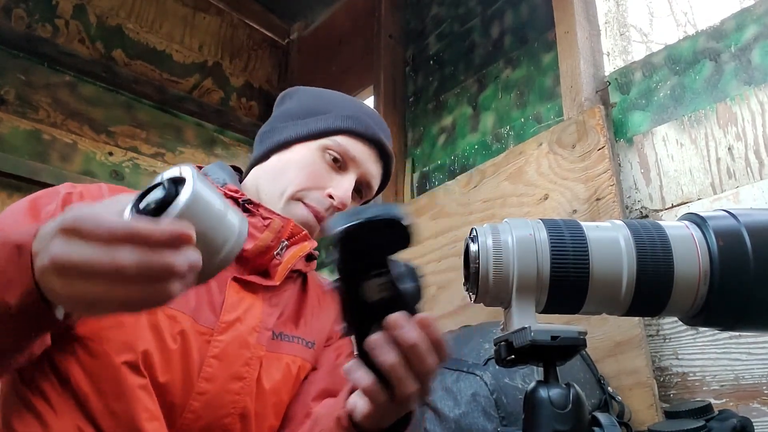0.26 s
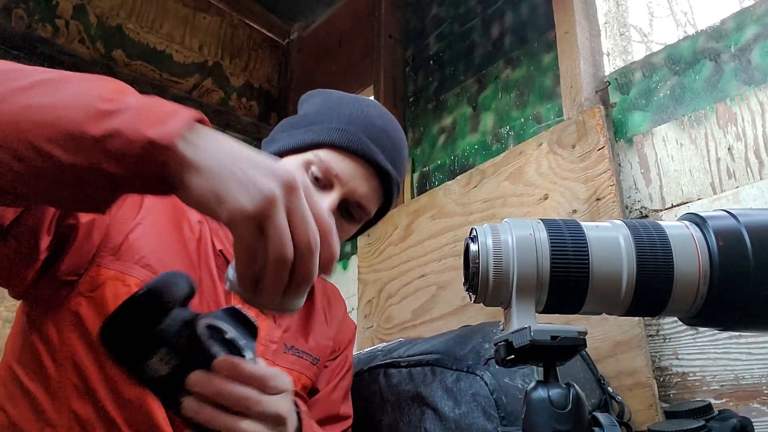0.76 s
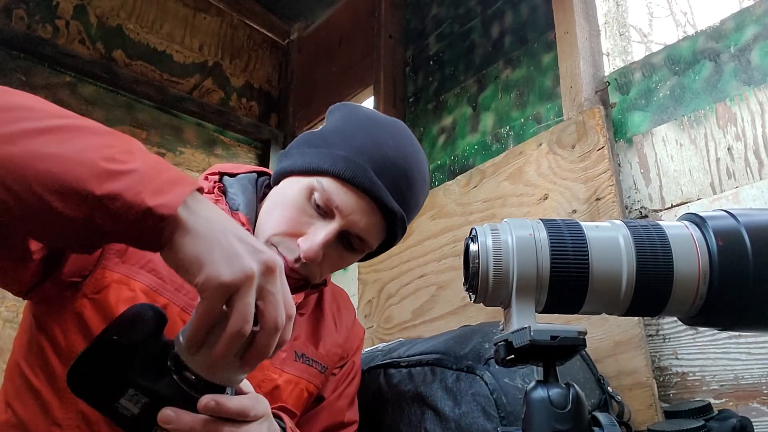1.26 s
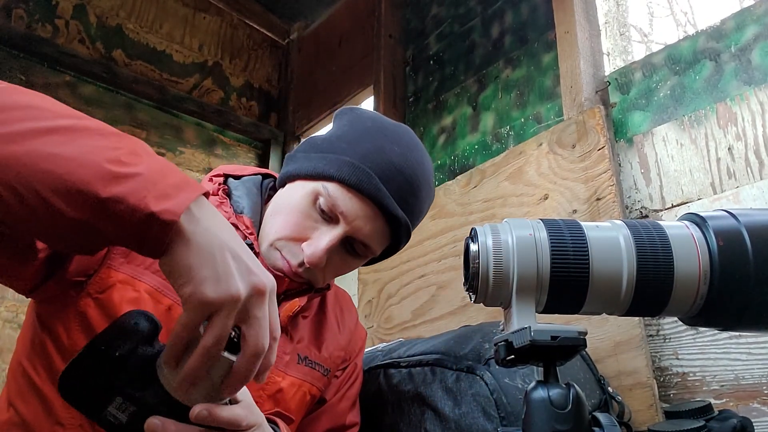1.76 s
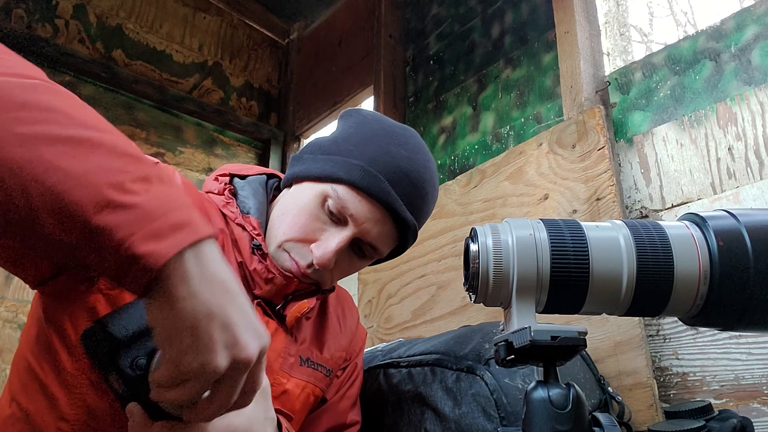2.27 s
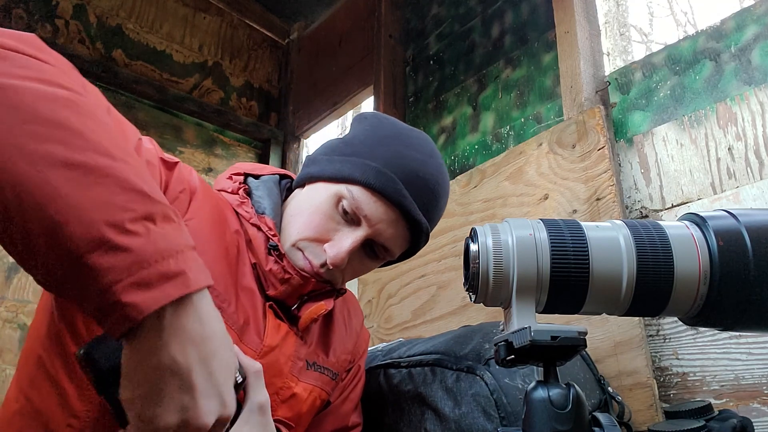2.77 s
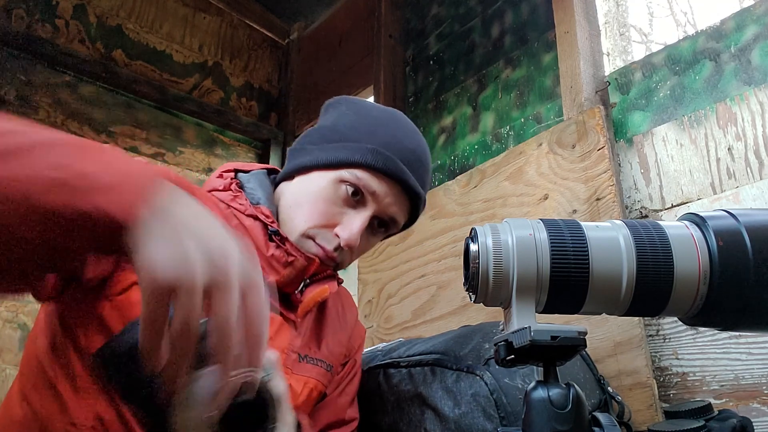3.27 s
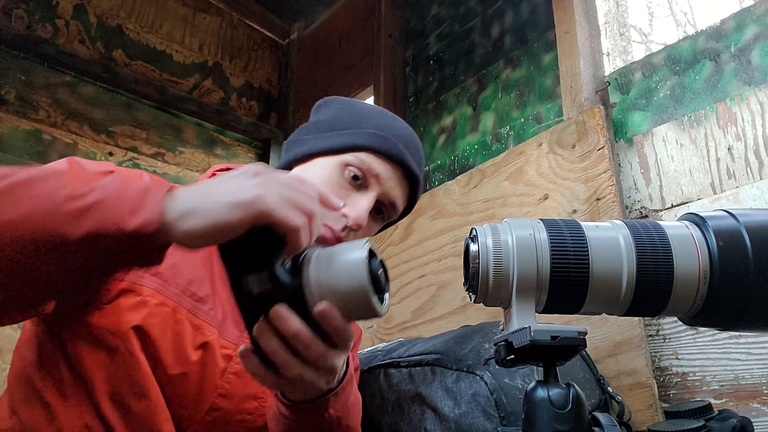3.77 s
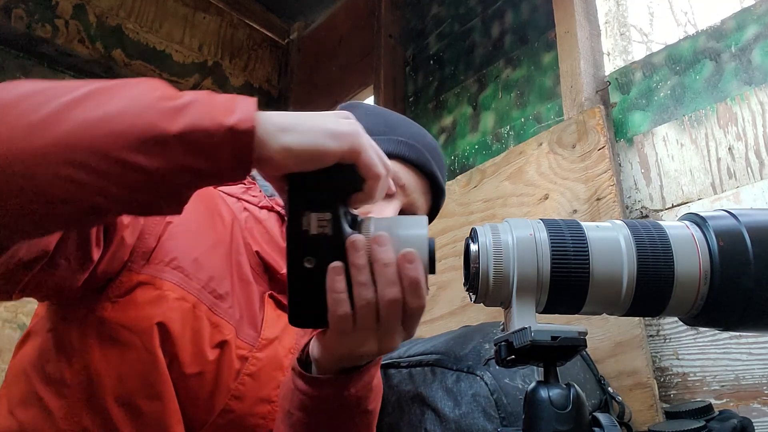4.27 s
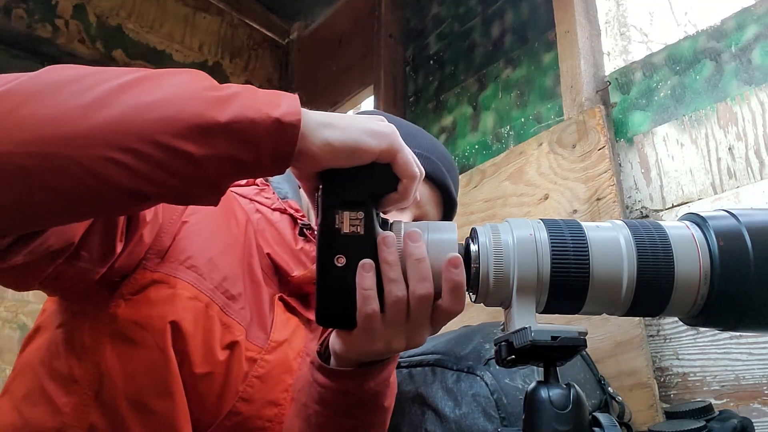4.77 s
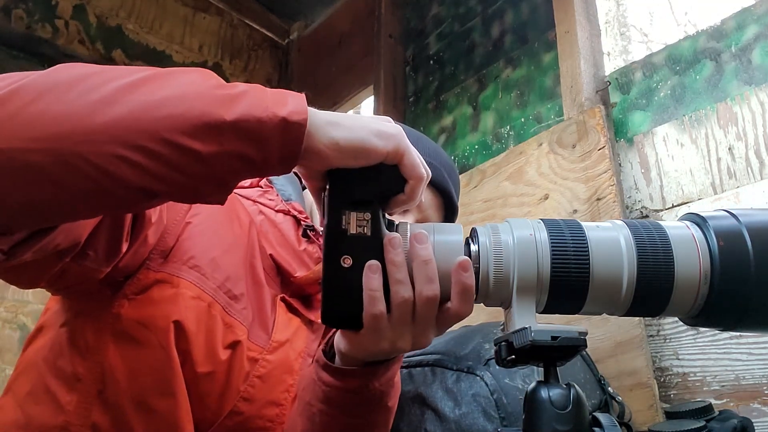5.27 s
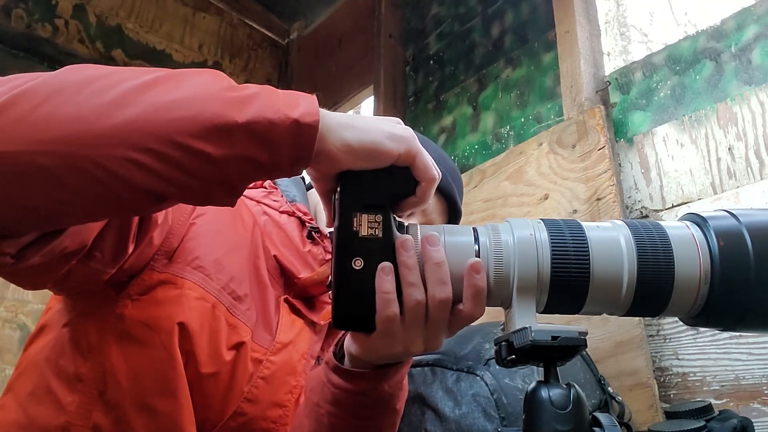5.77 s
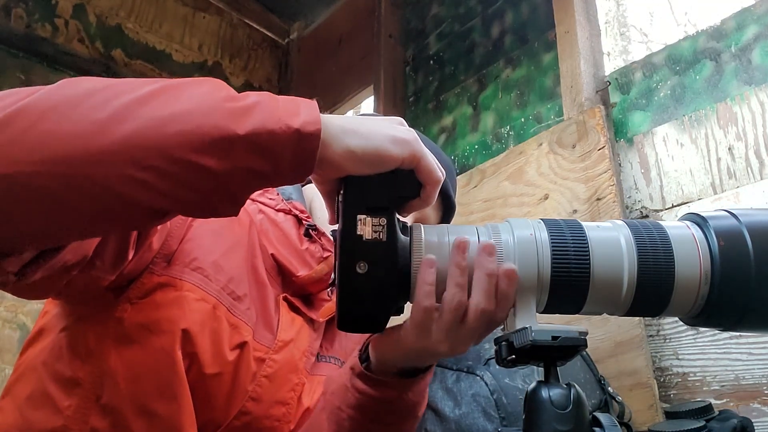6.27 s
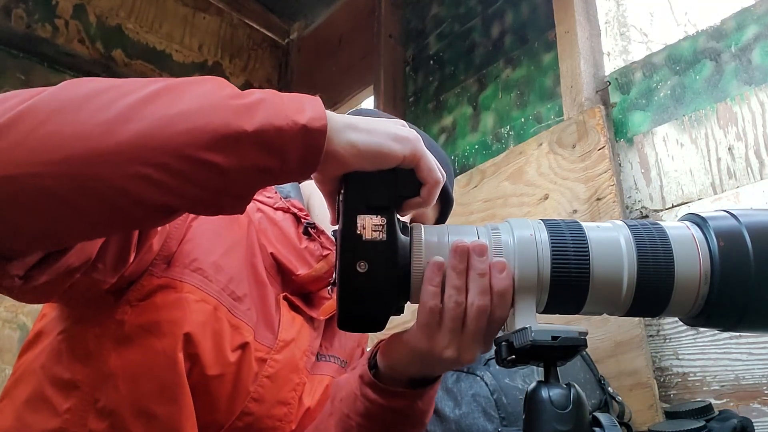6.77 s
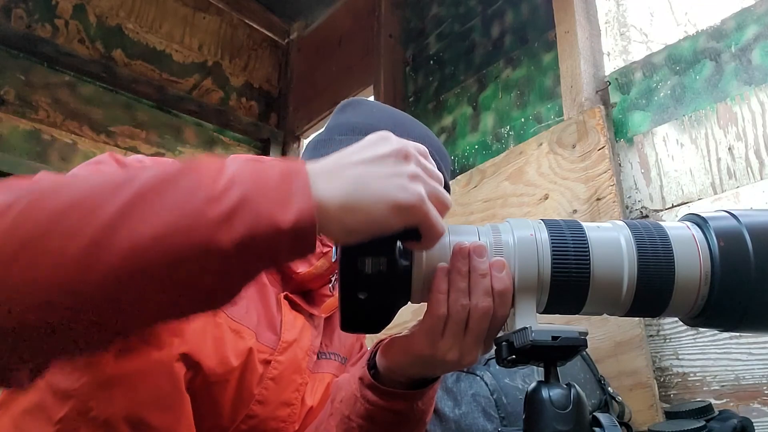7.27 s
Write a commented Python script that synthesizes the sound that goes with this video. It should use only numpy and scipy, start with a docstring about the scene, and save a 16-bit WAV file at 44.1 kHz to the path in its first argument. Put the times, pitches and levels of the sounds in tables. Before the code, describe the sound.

Nylon sleeves swish as metal camera and lens mounts are fitted together with sharp clicks and rattles, over a faint low hum.

```python
"""A nylon jacket swishes as arms move, its sleeves sliding over the cloth in a small plywood blind.
Then metal chatters: a teleconverter's bayonet lugs find a camera's mount, turn and latch, and the pair
is twisted onto a long lens. Each contact rings the parts and the hut; smooth barrels rub in between.
A faint low drone and a dull outdoor rumble lie under it all, heard by a spaced pair of microphones."""
import sys
import numpy as np
from scipy import signal
from scipy.fft import rfft, irfft, next_fast_len
from scipy.io import wavfile

SR = 44100
rng = np.random.default_rng(int(sys.argv[2]) if len(sys.argv) > 2 else 0)


def put_to_file(sound):
    """Save the sound as 16-bit audio at rate SR, in the file named by the first command-line argument."""
    columns = np.atleast_2d(sound).T  # one column per channel
    safe = np.clip(columns, -1, 1)
    whole_steps = np.round(safe * 32767)
    wavfile.write(sys.argv[1], SR, whole_steps.astype(np.int16))


N = 332073
TIME = np.arange(N) / SR
RING = 10240  # samples given to one hit and its tail

# metal-on-metal hits: (time [s], strength [dB], hardness [dB per octave])
LUG_HITS = [(1.3485, -3.5, 1.1), (1.3595, -1, -1.3), (1.3975, -6.5, 0.7), (1.416, 1.5, 0.6),
            (1.4395, 3.5, 0.1), (1.4455, -3.5, -4.5), (1.464, -7, -1), (1.48, -13, 0.5), (1.494, -3, -1.5),
            (1.502, -13.5, -3.5), (1.513, -2, -0.5), (1.5225, -6.5, -2), (1.565, -10.5, -2.5),
            (1.6425, -11.5, -5.5), (1.71, -21, -5.5), (1.775, 8, 2), (1.7815, 12, 1.95), (1.791, 2, -2),
            (1.7995, 6.5, 1.7)]  # the converter's lugs find the camera mount and drop in
TURN_HITS = [(1.9356, -25, 6.5), (1.958, 2, 1), (2.168, -25, -7.5), (2.185, -16.5, -3), (2.202, 2, -0.3),
             (2.415, -25.5, -10), (2.5856, -41, 11.5)]  # the bayonet turns in the mount
LATCH_HITS = [(2.8856, -25, 5.5), (2.8937, -21, 2.5), (2.8978, .5, 0.23)]  # its sprung pin snaps home
LENS_HITS = [(5.5495, -23, -.7), (5.579, -3.5, -4), (5.5835, -3, -1), (5.595, -3.5, -0.2), (5.6, -6, -0.5),
             (5.882, -10, -4), (5.888, -5.5, 0.5), (5.902, -7.5, -1.5), (5.912, -4, -0.6),
             (5.92, -2.5, -2.5), (5.938, -7, 1.5), (5.9703, 6.5, 0), (5.978, 4.5, 0.5), (5.981, -5.5, 8),
             (6.075, -23, -3), (6.196, -16, -4)]  # the pair meets the long lens
LOCK_HITS = [(6.578, -19.5, -2), (6.592, -18, -2.5), (6.609, -18.5, -2), (6.837, -23.5, -4),
             (6.926, -3.5, -2.5), (6.942, -12, 3), (6.949, -4.5, -1.5), (6.9625, -2.5, 3)]  # the lens bayonet turns and locks
# resonances of each struck part: (frequency [Hz], width [Hz], level [dB])
CONVERTER_MODES = [(271, 16, 11.5), (430, 9.4, 14), (605, 60, 5), (680, 54, 5), (923, 30, -2),
                   (2400, 80, 7.5), (2770, 110, 6), (2905, 46, 13), (3070, 44, 15), (3970, 110, 6.5)]
MOUNT_MODES = [(278, 14, 9.3), (640, 56, 6.3), (798, 53, 2.4), (1000, 160, 3.4), (2520, 140, 5),
               (2870, 220, 3.3), (3770, 390, 6.4), (6260, 830, 3.7)]
LATCH_MODES = [(1145, 40, 1), (1340, 130, 11), (1490, 150, 9), (2500, 190, 4.6), (3745, 450, -4.5),
               (4940, 400, 2), (6240, 340, 7), (14730, 1100, 6)]
LENS_MODES = [(187.9, 7.6, 16), (270, 5.9, 5), (333, 8.8, 5), (514, 17, 6), (713, 49, 4.5), (1027, 14, 7),
              (1140, 91, 7.5), (2034, 220, 12), (4850, 260, 10.5)]
LOCK_MODES = [(284, 11, 9.8), (430, 29, 5.8), (530, 30, 7.1), (2004, 140, 19.6), (2420, 62, 8.9),
              (4880, 120, 16.7), (6000, 300, 7.6)]
# band centres of a hit: (thud [Hz], knock [Hz], clack [Hz], ping [Hz], tick [Hz])
TONE_BANDS_HZ = [250, 700, 2600, 6000, 13000]
# tone of an ordinary hit on each part: (thud [dB], knock [dB], clack [dB], ping [dB], tick [dB])
CONVERTER_TONE = [-4.5, -0.5, -10, -17, -22.5]
MOUNT_TONE = [-4.5, 1, -4.5, -21, -24.5]
LATCH_TONE = [2.5, 0, 5, -5, -6]
LENS_TONE = [-3, -0.5, -15, -19.5, -28.5]
LOCK_TONE = [-2, -7.5, -20.5, -27.5, -41]
# colour shared by all hits: (frequency [Hz], gain [dB])
HIT_EQ = [(40, -15.5), (115, 0), (150, -5), (300, -1), (700, -2.5), (1100, -4.5), (1800, -7), (3000, -1),
          (4000, 0.5), (4900, -6), (6400, -1), (9000, -7.5), (12000, 3.5), (15500, -2)]
# sleeve drags: (peak time [s], rise [s], fall [s], relative level [dB], extra hiss [dB])
ARM_MOVES = [(0.02, .15, 0.12, -75, 5), (0.48, 0.22, .17, -64, 1.5), (0.72, 0.39, 0.16, -58, 3),
             (1.08, 0.14, .14, -77.5, 7), (1.8, 0.45, 0.68, -77.5, 4.5), (2.28, 0.1, 0.1, -65.5, 1),
             (2.51, 0.095, 0.21, -71.5, 2.5), (2.83, 0.086, 0.16, -67, -0.5), (3.2, 0.094, 0.084, -64.5, 3),
             (3.429, 0.17, 0.13, -59.5, 3.5), (4.09, 0.21, 0.22, -61.5, 1.5), (4.36, 0.05, 0.12, -74, 0.5),
             (4.75, 0.23, .33, -88.5, 8.5), (6.06, .1, 0.086, -72, -1.5), (6.35, 0.18, 0.31, -86.5, 0),
             (7.24, 0.19, 0.21, -74, -.5)]
# nylon on nylon, its swish and its fine hiss: (frequency [Hz], relative level [dB])
NYLON_SWISH = [(120, -1.5), (300, 16.5), (580, 7.5), (900, -2), (1400, 3), (1900, -5), (2700, 3),
               (3400, -1), (4300, 2), (5200, -2), (6300, 2), (8500, -6.5), (11000, -9.5), (15000, -31)]
NYLON_HISS = [(6000, -44.5), (9500, -12.5), (11500, 0), (13000, 0), (15200, 0.5)]
# sleeves and smooth barrels rubbing: (time [s], length [s], start pitch [Hz], end pitch [Hz], level [dB])
RUBS = [(0.031, 0.2, 1336, 1440, -84), (0.22, 0.23, 2563, 2707, -64.5), (0.38, 0.23, 4000, 4200, -60),
        (1.432, 0.124, 433, 494, -44.5), (1.442, 0.12, 3335, 3350, -58), (2.23, 0.16, 1736, 1600, -68.5),
        (2.745, 0.23, 2675, 2830, -69), (3.506, 0.11, 3450, 4100, -66.5), (3.932, 0.2, 4490, 4300, -63),
        (6.066, 0.083, 1163, 1136, -70)]
# partials of the drone: (frequency [Hz], level [dB], pitch wander [Hz], level waver [0-1])
DRONE_PARTIALS = [(58.55, -55.5, .9, 0.3), (116.5, -66, 2.1, 0.6), (335, -70.5, 5.8, 0.8)]
# outdoor rumble and microphone hiss: (frequency [Hz], relative level [dB])
RUMBLE = [(15, -26), (45, -5.5), (62, -4.5), (80, -6), (115, -8), (140, -16.5), (190, -13), (260, -19),
          (340, -21), (430, -26), (800, -45), (1800, -47.5), (5000, -59)]
MIC_HISS = [(900, -10), (1900, -11.5), (2500, 0), (4800, -10.5), (6400, -9.5), (8500, -17.5),
            (10000, -14.5), (11700, -8), (13000, -6), (15500, -0.5)]
# mismatch in colour between the microphones: (frequency [Hz], left minus right [dB])
MIC_MISMATCH = [(100, 0.5), (250, -0.5), (450, -0.5), (800, -3), (1400, 8.5), (2250, -5), (3200, 0),
                (4800, 2.5), (8000, -4.5), (11800, -2.5), (14500, 8)]


def bayonet_hits(hits, tone, modes, lag_ms, crack_db, shell_db, shell_t60_s, hut_db, hut_t60_s):
    """Each hit is a crack, a shell rattle and the hut's echo, all coloured by the struck part's modes."""
    out, hz = np.zeros((2, N + RING)), bins(RING)
    # narrow modes ring on above a broad, well-damped body
    ringing = sum(undb(2 * db) / (1 + ((hz / f - f / hz) * f / width) ** 2) for f, width, db in modes)
    tone_db = np.interp(np.log(hz), np.log(TONE_BANDS_HZ), tone)
    body_db = 10 * np.log10(1 + ringing) + curve(HIT_EQ, hz) + tone_db
    # harder is brighter: the spectrum tilts about 1500 Hz
    octaves = np.log2(np.clip(hz, TONE_BANDS_HZ[0], TONE_BANDS_HZ[-1]) / 1500)
    delay_s = np.array([[lag_ms / 1000], [0]])  # the crack reaches the right microphone first
    crack = undb(crack_db) * np.exp(-2j * np.pi * hz * delay_s)
    shell_power = undb(2 * shell_db) * octave_decay(shell_t60_s, damping=0.5)
    hut_power = undb(2 * hut_db) * octave_decay(hut_t60_s, damping=0.24)
    envelopes = np.sqrt(shell_power + hut_power)
    for time_s, strength_db, hardness in hits:
        start = int(time_s * SR)
        body = minimum_phase(body_db + strength_db + hardness * octaves)
        out[:, start:start + RING] += irfft((crack + ring_tail(envelopes)) * body)
    return out[:, :N]


def octave_decay(t60_s, damping):
    """Fading power in each octave, summing to 1; t60_s holds at 1 kHz and the treble dies sooner."""
    octave = np.arange(-3, 5)[:, None]
    power = undb(-120 * TIME[:RING] / (t60_s * 2 ** (-damping * octave)))
    return power / power.sum(axis=1, keepdims=True)


def ring_tail(envelopes):
    """Spectrum of dense modes dying away by octave; each octave holds its share of a unit click."""
    octave = np.clip(np.round(np.log2(bins(RING) / 125)), 0, 7)
    bands = octave == np.arange(8)[:, None, None]
    rings = irfft(diffuse(RING) * bands) * envelopes[:, None]
    energy = np.sum(rings ** 2, axis=(1, 2), keepdims=True) / 2
    share = bands.mean(axis=2, keepdims=True)
    return rfft(np.sum(rings * np.sqrt(share / energy), axis=0))


def jacket(swish_db, hiss_db, grain_db, flutter_db):
    """Sleeves slide over the jacket with each arm move; the weave catches and lets go in fine grains."""
    swish_swell, hiss_swell = 0, 0
    for peak_s, rise_s, fall_s, db, extra_hiss_db in ARM_MOVES:
        from_peak = np.abs(TIME - peak_s) / np.where(TIME < peak_s, rise_s, fall_s)
        move = undb(db) * np.exp(-from_peak ** 1.4)  # between pointed (1) and bell-shaped (2)
        swish_swell = np.hypot(swish_swell, move)
        hiss_swell = np.hypot(hiss_swell, undb(extra_hiss_db) * move)
    catch = unit_rms(undb(grain_db * wander(450) + flutter_db * wander(25)))
    swish = undb(swish_db) * swish_swell * noise_bed(NYLON_SWISH)
    hiss = undb(hiss_db) * hiss_swell * noise_bed(NYLON_HISS)
    return catch * (swish + hiss)


def rubs(relative_width):
    """Brief friction of sleeves and barrels: a band of noise whose centre slides as the parts move."""
    out = np.zeros((2, N))
    for time_s, length_s, start_hz, end_hz, db in RUBS:
        start, size = int(time_s * SR), min(int(length_s * SR), RING)
        rolloff = 1 + (bins(RING) / (relative_width * start_hz)) ** 2
        roughness = irfft(diffuse(RING) / rolloff)[:, :size]
        glide_hz = np.linspace(start_hz, end_hz, size)
        phase = 2 * np.pi * (np.cumsum(glide_hz) / SR + rng.random((2, 1)))
        fade = np.hanning(size) ** .5
        out[:, start:start + size] += undb(db) * unit_rms(roughness * np.sin(phase) * fade)
    return out


def drone():
    """A low hum that wavers in pitch and strength."""
    out = 0
    for hz, db, wander_hz, waver in DRONE_PARTIALS:
        phase = 2 * np.pi * np.cumsum(hz + wander_hz * wander(12)) / SR
        out = out + undb(db) * unit_rms(np.sin(phase) * (1 + waver * wander(11)))
    return out


def room_tone(rumble_db, hiss_db):
    """Dull outdoor rumble through the walls, with the microphones' own hiss."""
    return undb(rumble_db) * noise_bed(RUMBLE) + undb(hiss_db) * noise_bed(MIC_HISS)


def noise_bed(colour):
    """Steady diffuse noise of a given colour, at rms 1."""
    size = next_fast_len(N, real=True)
    spectrum = diffuse(size) * undb(curve(colour, bins(size)))
    return unit_rms(irfft(spectrum)[:, :N])


def diffuse(size, spacing_m=0.19):
    """Spectrum of noise from all sides at two microphones: centred in the bass, wide above."""
    likeness = .96 * np.sinc(2 * bins(size) * spacing_m / 343)
    mid, side = rfft(rng.standard_normal((2, size))) * np.sqrt([1 + likeness, 1 - likeness])
    return np.array([mid + side, mid - side]) / np.sqrt(2)


def wander(rate_hz):
    """Smooth random modulation at rms 1."""
    knots = signal.resample(rng.standard_normal(4096), 8 * 4096)
    return unit_rms(np.interp(TIME * rate_hz, np.arange(len(knots)) / 8, knots))


def minimum_phase(db):
    """Frequency response with the given gains that rings only after the attack."""
    cepstrum = irfft(np.log(undb(db)))
    half = len(cepstrum) // 2
    cepstrum[1:half] *= 2
    cepstrum[half + 1:] = 0
    return np.exp(rfft(cepstrum))


def curve(points, hz):
    """Read an EQ curve on a log-frequency axis."""
    point_hz, db = np.transpose(points)
    return np.interp(np.log(hz), np.log(point_hz), db)


def bins(size):
    """Frequencies of a spectrum, floored at 1 Hz."""
    return np.maximum(np.fft.rfftfreq(size, 1 / SR), 1)


def undb(db):
    """Decibels to gain."""
    return 10 ** (np.asarray(db) / 20)


def unit_rms(x):
    """Scale to rms 1."""
    return x / np.sqrt(np.mean(x ** 2))


def scene():
    """Two bayonets click home up front, over cloth, friction and a quiet bed."""
    lugs = bayonet_hits(LUG_HITS, CONVERTER_TONE, CONVERTER_MODES, lag_ms=0.4, crack_db=-19.5,
                        shell_db=-5.5, shell_t60_s=0.035, hut_db=-5.0, hut_t60_s=0.14)
    turn = bayonet_hits(TURN_HITS, MOUNT_TONE, MOUNT_MODES, lag_ms=0.13, crack_db=-20,
                        shell_db=-7.0, shell_t60_s=0.065, hut_db=-10.0, hut_t60_s=0.17)
    latch = bayonet_hits(LATCH_HITS, LATCH_TONE, LATCH_MODES, lag_ms=0.39, crack_db=-13.0,
                         shell_db=-2.0, shell_t60_s=0.0294, hut_db=-3.0, hut_t60_s=0.16)
    lens = bayonet_hits(LENS_HITS, LENS_TONE, LENS_MODES, lag_ms=0.0985, crack_db=-10.0,
                        shell_db=-6.0, shell_t60_s=0.044, hut_db=-0.5, hut_t60_s=0.15)
    lock = bayonet_hits(LOCK_HITS, LOCK_TONE, LOCK_MODES, lag_ms=0.061, crack_db=-15.0,
                        shell_db=0.5, shell_t60_s=0.037, hut_db=-3.5, hut_t60_s=0.2)
    cloth = jacket(swish_db=7, hiss_db=4.5, grain_db=0.8, flutter_db=0.97)
    friction = rubs(relative_width=0.292)
    bed = drone() + room_tone(rumble_db=-58.0, hiss_db=-77)
    return lugs + turn + latch + lens + lock + cloth + friction + bed


def record(dry):
    """Each microphone adds its own colour; the top is cut steeply above 16.1 kHz."""
    size = next_fast_len(N + RING, real=True)
    mismatch_db = np.array([[.5], [-.5]]) * curve(MIC_MISMATCH, bins(size))
    mics = irfft(rfft(dry, size) * undb(mismatch_db), size)[:, :N]
    high_cut = signal.ellip(10, .2, 70, 16100, fs=SR, output="sos")
    return signal.sosfilt(high_cut, mics)


dry = scene()
out = record(dry)
put_to_file(out)
```